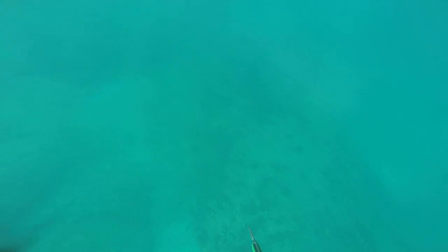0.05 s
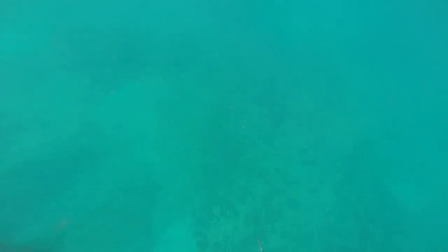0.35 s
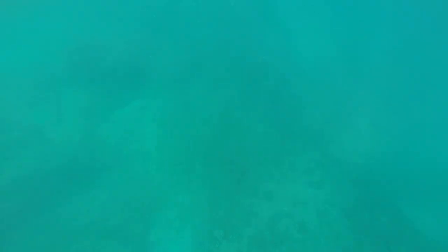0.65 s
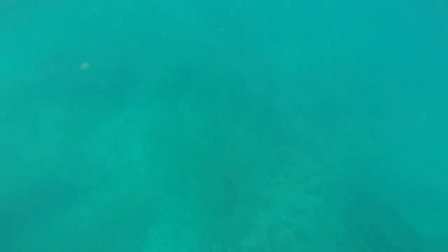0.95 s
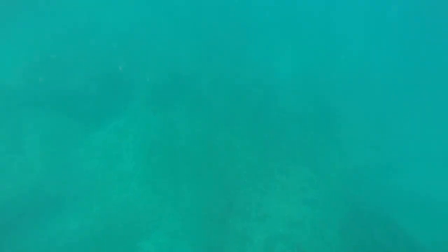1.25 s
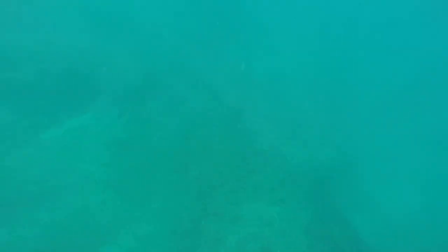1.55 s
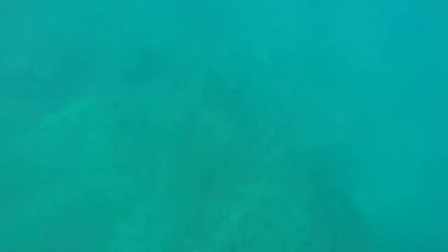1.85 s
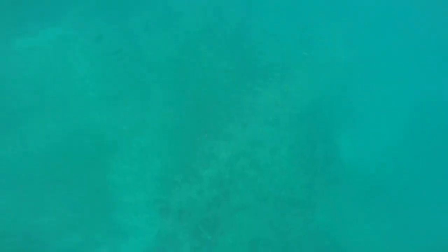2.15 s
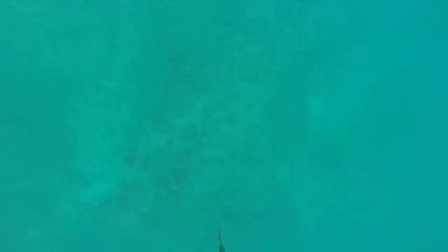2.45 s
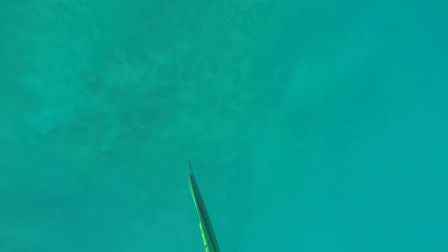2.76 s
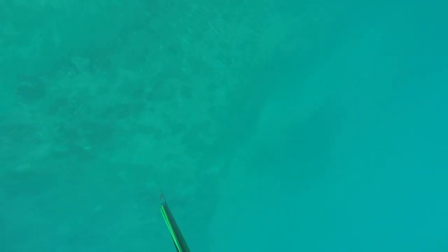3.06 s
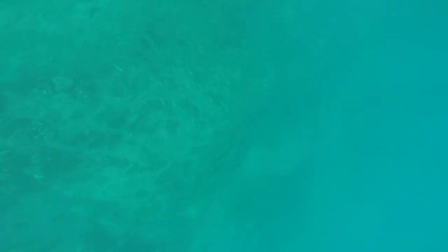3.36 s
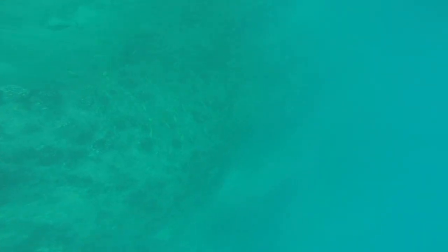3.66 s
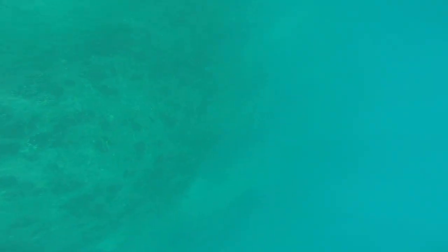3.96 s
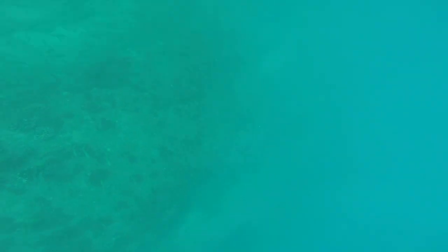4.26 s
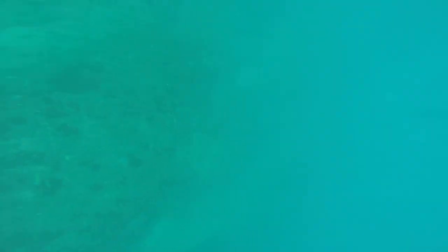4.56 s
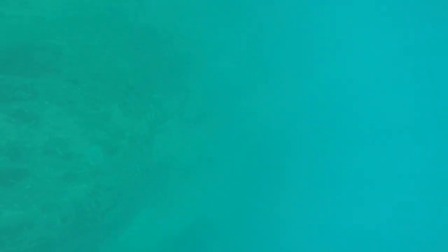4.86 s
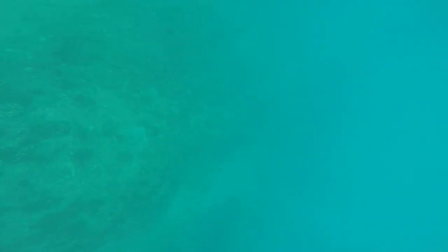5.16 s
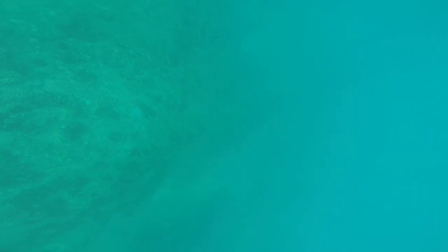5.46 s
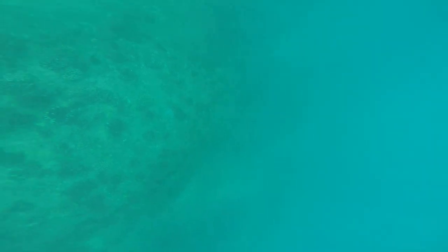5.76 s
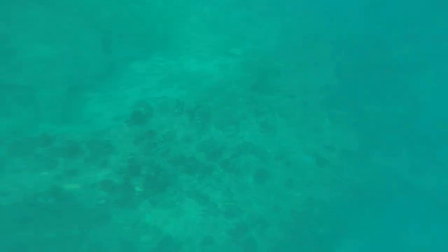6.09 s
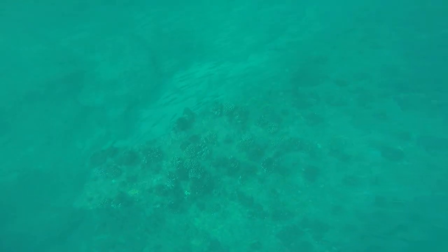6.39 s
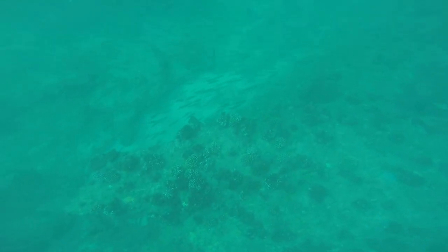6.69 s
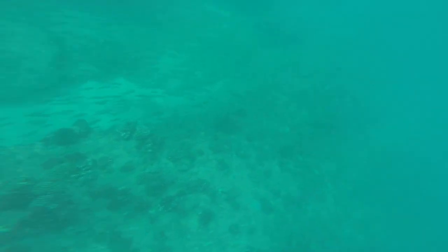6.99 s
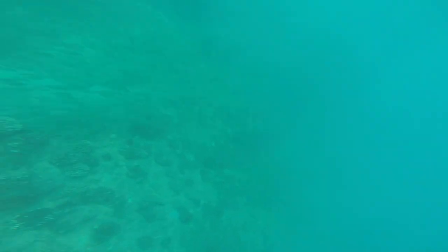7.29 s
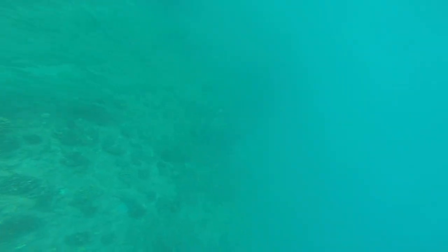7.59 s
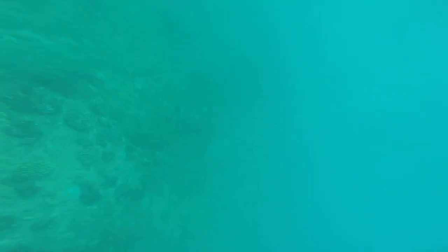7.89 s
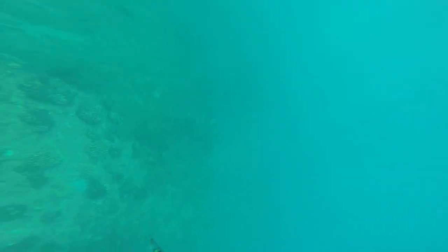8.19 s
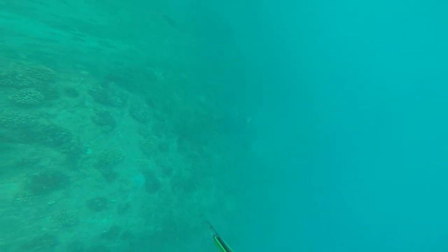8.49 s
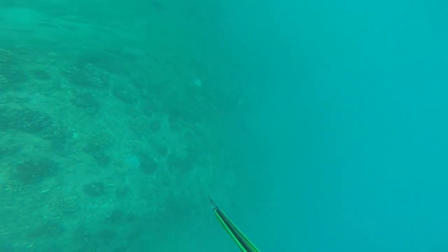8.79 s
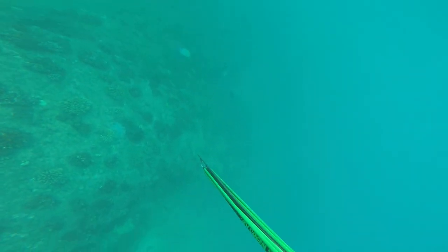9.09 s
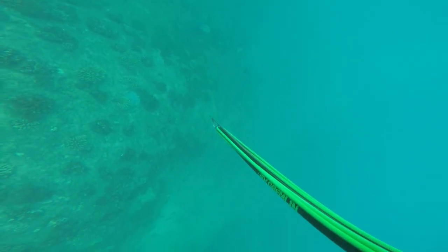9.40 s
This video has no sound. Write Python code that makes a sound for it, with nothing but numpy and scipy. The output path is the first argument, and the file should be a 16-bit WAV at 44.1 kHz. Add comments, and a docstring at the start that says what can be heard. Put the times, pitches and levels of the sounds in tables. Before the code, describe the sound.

Heard from inside a waterproof camera case, swirling water makes a muffled, uneven rumble. Bursts of bubbles gurgle close by, mixed with dull knocks and low thuds on the housing, the loudest a little past the middle. Runs of soft taps take over as the bubbles die down. Behind it all the reef crackles lightly, like snapping shrimp, with a faint hollow hum and a very faint electronic whine.

```python
"""Diver's camera over a reef

A swimming diver carries a camera in a waterproof housing. Eddies rumble on the case, clouds of
pulsating air bubbles gurgle past, and the case rings with dull knocks and runs of soft taps.
Behind it the reef crackles, most likely with snapping shrimp, over a hollow hum and a faint
electronic whine."""
import sys
import numpy as np
from scipy import signal
from scipy.io import wavfile
from scipy.ndimage import uniform_filter1d, map_coordinates

SR = 44100
rng = np.random.default_rng(int(sys.argv[2]) if len(sys.argv) > 2 else 0)


def log_audio(samples):
    """Write samples as a 16-bit WAV file to the path given in sys.argv[1]."""
    # one column per channel
    frames = np.atleast_2d(samples).T
    # limit to full scale, then quantise
    limited = np.clip(frames, -1, 1)
    pcm = np.round(limited * 32767).astype(np.int16)
    wavfile.write(sys.argv[1], SR, pcm)


N = 425124
TIME_S = np.arange(N) / SR

# electronics tones (frequency [Hz], rms level [dB])
WHINE_TONES = [(5844, -80), (8781, -91), (11688, -87), (11718, -86), (14627, -88)]
# hollow hum (time [s], level [dB])
HUM_LEVEL = [(0, -63.5), (.4, -47.5), (1.5, -46), (2.1, -65.5), (9.64, -50)]
# hollow hum (frequency [Hz], relative density [dB])
HUM_SHAPE = [(100, -16), (150, 5.5), (178, -3.5), (220, -27.5), (400, -14.5), (520, -19), (850, -18.5),
             (1400, -77), (4000, -74)]
# reef crackle (time [s], level [dB])
REEF_LEVEL = [(0, -68.5), (1.2, -57.5), (1.6, -60), (2.3, -56.5), (4.5, -56), (9.64, -56.5)]
# far snaps merged into a wash (frequency [Hz], relative density [dB])
WASH_SHAPE = [(120, -61), (200, -0.5), (272, -48), (476, -43.5), (671, 7), (946, -20), (1430, -29),
              (1880, -4), (2170, -9), (2460, -3.5), (2950, -11), (7150, -18.5), (8410, -28), (11400, -27.5),
              (15000, -75)]
# path through the case wall (frequency [Hz], relative gain [dB])
WALL_RESPONSE = [(300, -3), (700, 9), (1400, -2.5), (1850, 15), (2130, 0.5), (2350, 14), (2900, 3.5),
                 (4100, 4), (6200, -7), (7400, -1.5), (8400, -16), (10800, -10.5), (13500, -27),
                 (15500, -73)]
# near snaps (time [s], peak [dB], emphasis [Hz])
NEAR_SNAPS = [(0.135, -43, 6350), (0.343, -42, 3870), (.707, -32.5, 4000), (1.178, -36, 3900),
              (1.2049, -18.5, 4000), (1.952, -31, 5230), (2.332, -29.5, 3700), (2.362, -27, 2230),
              (2.599, -27.5, 2850), (3.156, -26, 1480), (3.672, -28, 5240), (3.693, -22, 2280),
              (4.175, -31.5, 6400), (4.723, -30, 6230), (4.85, -23, 3640), (5.49, -20, 2200),
              (5.815, -29, 2060), (6.028, -26, 1770), (6.523, -30, 5500), (6.577, -27, 3050),
              (7.236, -27, 2970), (8.215, -26.5, 1820), (8.553, -30.5, 3600), (8.775, -36, 1200),
              (8.964, -26, 2050), (9.412, -27, 3670)]
# water pushing past the case (time [s], level [dB])
FLOW_LEVEL = [(0, -54.5), (.72, -32.5), (1.3, -37), (1.85, -29), (2.02, -32.5), (2.28, -28), (2.55, -28.5),
              (3.2, -30), (3.5, -31), (4.17, -32), (4.3, -39.5), (5.9, -37.5), (6.29, -30), (6.5, -37.5),
              (7.3, -36.5), (8.6, -39), (8.8, -40), (9.64, -41.5)]
# eddy pressure (frequency [Hz], relative density [dB])
EDDY_SHAPE = [(12, 2), (25, 3.5), (45, -2.5), (70, -10.5), (110, -10.5), (140, -14), (175, -18),
              (235, -26.5), (320, -29.5), (430, -27.5), (600, -27.5), (800, -34.5), (1500, -44),
              (4000, -112)]
# runs of taps, each quicker than the last (first [s], last [s], nominal gap [s], level [dB])
SOFT_TAP_RUNS = [(5.038, 5.978, .157, -41), (6.546, 7.13, .146, -36.5), (7.297, 8.141, .14, -39),
                 (8.233, 9.634, .1, -38)]
# case modes under a tap (frequency [Hz], gain [dB], t60 [s])
SOFT_TAP_MODES = [(80, -9, 0.091), (115, 1.5, 0.047), (171, 6.5, 0.049), (456, -6, 0.011), (664, 2, 0.021)]
# slugs of water hitting the case (time [s], level [dB], frequency [Hz])
WATER_SHOVES = [(1.868, -20, 32.4), (2.206, -16, 85.5), (2.258, -15, 80), (2.289, -18.5, 85.6),
                (2.988, -11.5, 95), (3.155, -8.5, 72), (3.984, -12, 49.5), (6.173, -20.5, 74.5),
                (6.34, -10.5, 62), (6.359, -4, 73), (7.115, -22, 29.6), (7.717, -29, 43)]
# knocks on the case (time [s], level [dB], body pitch [Hz], shell gain [dB])
CASE_KNOCKS = [(.564, -25.5, 115, -11.5), (0.729, -14.5, 115, -16), (0.781, -22.5, 108, -18),
               (.93, -14, 127, -10), (0.995, -9, 132, -8.5), (2.542, -17.5, 137, -2.5),
               (3.006, -17, 134, 4), (3.11, -15, 78, -19), (3.155, -13.5, 148, -2.5),
               (3.986, -15.5, 162, -11), (4.144, -15.5, 111, -19), (5.352, -21, 119, -58),
               (6.134, -25.5, 192, 0.5), (6.188, -14.5, 109, -22), (6.365, -2.5, 201, -15),
               (9.585, -33, 221, 5.5)]
# case modes under a knock (frequency [Hz], gain [dB], t60 [s])
SHELL_MODES = [(325, 1.5, 0.019), (430, -5.5, 0.044), (706, -14, 0.021)]
# puffs of loose air (crest time [s], level [dB], swell [dB/s], fade [dB/s])
AIR_PUFFS = [(2.26, -28, 58, 36), (3.0, -30.5, 38, 25.5), (3.61, -28, 200, 65), (3.88, -35, 200, 127),
             (4.05, -30.5, 220, 31), (4.38, -37.5, 158, 11), (4.6, -28.5, 172, 181), (4.78, -33.5, 296, 35),
             (5.42, -30.5, 117, 18.5), (6.12, -37, 11, 34), (6.58, -43.5, 150, 170), (7.12, -45, 42, 75),
             (7.77, -47, 133, 81)]
# small bubbles shed by the swirl (time [s], level [dB])
FIZZ_LEVEL = [(1.3, -69), (1.72, -83), (1.85, -58), (4.3, -54.5), (4.7, -43), (5.0, -54), (6.2, -51),
              (7.8, -57.5), (8.3, -58), (8.7, -67), (9.64, -62)]
# bubble showers (start [s], length [s], level [dB], middle pitch [Hz], pitch spread [octaves])
AIR_GUSHES = [(1.793, 0.049, -55, 1880, 0.15), (2.201, 0.17, -37.5, 430, 0.81),
              (3.155, 0.014, -28.5, 1175, 0.52), (4.003, 0.091, -32.5, 692, 0.37),
              (4.542, .081, -33.5, 447, 0.27), (4.776, 0.058, -34.5, 435, 0.25),
              (5.448, .082, -38, 570, 0.11), (6.203, 0.036, -42, 1670, 0.12),
              (6.327, 0.057, -25.5, 307, 0.676)]
# single bubbles (time [s], level [dB], pitch [Hz], t60 [s])
SINGLE_BUBBLES = [(.499, -36, 1650, .026), (1.456, -28, 1880, .03), (1.638, -17.5, 1175, .016),
                  (1.799, -34, 1700, 0.031), (1.846, -36.5, 1900, .035), (1.889, -31, 1003, 0.071),
                  (1.99, -37, 580, 0.21), (2.123, -28.5, 1690, 0.067), (2.16, -25, 567, 0.25),
                  (2.208, -15, 430, 0.033), (2.256, -20, 298, 0.028), (2.335, -18, 650, 0.074),
                  (2.392, -23, 453, 0.19), (2.546, -18, 635, 0.022), (2.7, -15.5, 515, 0.025),
                  (2.84, -21.5, 502, 0.049), (3.006, -20, 472, 0.15), (3.032, -7.5, 430, 0.051),
                  (3.033, -9, 720, 0.023), (3.544, -21.5, 633, 0.053), (3.573, -23, 329, .17),
                  (3.866, -25.5, 738, .073), (4.569, -13.5, 525, .067), (4.601, -15, 440, 0.11),
                  (4.776, -17, 470, 0.13), (4.947, -24.5, 365, 0.24), (5.184, -26, 1670, .022),
                  (5.313, -21, 466, 0.1), (5.379, -34.5, 1100, 0.11), (5.421, -28, 1560, .025),
                  (5.451, -15, 558, 0.081), (5.463, -19.5, 493, 0.26), (5.904, -23, 677, 0.033),
                  (6.07, -27, 615, .15), (6.281, -13, 320, 0.022), (6.489, -27.5, 693, 0.075),
                  (6.539, -14, 585, 0.038), (6.566, -12.5, 500, 0.012), (6.587, -15, 555, 0.019),
                  (6.692, -20, 470, 0.03), (6.975, -33, 1806, 0.062), (7.06, -25.5, 750, 0.067),
                  (7.572, -33, 620, 0.097), (7.733, -27, 763, 0.051), (7.77, -37.5, 573, .22),
                  (8.1, -35, 673, 0.12), (8.172, -33.5, 640, 0.14), (8.271, -35, 1830, .035),
                  (8.3, -37, 720, 0.076), (8.371, -36.5, 1860, .035)]
# largest bubbles in the cloud (time [s], pitch [Hz])
DEEPEST_PITCH = [(1.9, 755), (2.27, 275), (2.5, 372), (2.85, 439), (3.4, 251), (4.1, 166.7), (4.6, 297.4),
                 (6.05, 487), (6.3, 312), (7.1, 530)]


def gain_of(db):
    return 10 ** (np.asarray(db) / 20)


def unit_rms(x):
    return x / np.sqrt(np.mean(x ** 2) + 1e-20)


def steadied(x, window_s):
    """Unit rms over a sliding window; faster flicker stays."""
    size = max(int(window_s * SR), 2)
    power = abs(uniform_filter1d(uniform_filter1d(x ** 2, size), size))
    return x / np.sqrt(power + 1e-6 * np.mean(x ** 2))


def follow(curve, at_s=TIME_S):
    return np.interp(at_s, *np.transpose(curve))


def add(mix, start_s, sound):
    part = mix[max(round(start_s * SR), 0):][:len(sound)]
    part += sound[:len(part)]


def colour(x, response, size=8192):
    """Minimum-phase filter from (frequency [Hz], gain [dB]): clicks stay sharp, then ring."""
    hz, db = np.transpose(response)
    bins_hz = abs(np.fft.fftfreq(size, 1 / SR)) + 1
    log_gain = np.log(gain_of(np.interp(np.log(bins_hz), np.log(hz), db)))
    spectrum = np.exp(np.conj(signal.hilbert(log_gain)))
    impulse = np.fft.ifft(spectrum).real[:size // 2]
    return signal.fftconvolve(x, impulse)[:len(x)]


def shaped_noise(shape):
    return unit_rms(colour(rng.standard_normal(N), shape))


def softened(x, cutoff_hz):
    """Low-pass: a blunt contact leaves out the treble."""
    return signal.sosfilt(signal.butter(4, cutoff_hz, fs=SR, output="sos"), x)


def ring(modes, length_s=.2):
    """Decaying sines, struck together."""
    t = np.arange(int(length_s * SR)) / SR
    return sum(gain_of(db - 60 * t / t60_s) * np.sin(2 * np.pi * hz * t) for hz, db, t60_s in modes)


def whine(drift_hz=9, flutter_db=2.5, hiss_db=-71.5, fade_in_s=.56):
    """Wavering electronics tones, half hidden in hiss."""
    knots_s = np.arange(0, N / SR + 1, .02)
    drift, flutter = (np.interp(TIME_S, knots_s, row) for row in rng.standard_normal((2, len(knots_s))))
    tones = sum(gain_of(db) * np.sqrt(2) * np.sin(2 * np.pi * np.cumsum(hz + drift_hz * drift) / SR)
                for hz, db in WHINE_TONES)
    hiss = gain_of(hiss_db) * rng.standard_normal(N)
    return (tones * gain_of(flutter_db * flutter) + hiss) * np.minimum(TIME_S / fade_in_s, 1)


def hum():
    """Low, hollow band of noise in the water."""
    return gain_of(follow(HUM_LEVEL)) * shaped_noise(HUM_SHAPE)


def snap(hz, focus_db=10):
    """One snap, smeared by short paths through the case, emphasised near hz."""
    t = np.arange(SR // 25) / SR
    envelope = (np.exp(-t / .0009) + .14 * np.exp(-t / .006)) * (1 - np.exp(-t / .0002))
    through_wall = colour(rng.standard_normal(len(t)) * envelope, WALL_RESPONSE)
    return colour(through_wall, [(hz / 1.6, -focus_db), (hz, 0), (hz * 1.6, -focus_db)])


def reef(clicks_per_s=560, spread_db=7.5, bands=16, dull_db=5, wash_db=3, bright_db=-1.5):
    """Countless snaps; the farthest merge into a wash."""
    fires = rng.random(N) < clicks_per_s / SR
    clicks = fires * gain_of(spread_db * np.minimum(rng.standard_normal(N), 2.5))
    band = rng.integers(0, bands, N)
    crackle = np.zeros((bands, N))
    for k, hz in enumerate(np.geomspace(1800, 10500, bands)):
        crackle[k] = signal.oaconvolve(clicks * (band == k), snap(hz))[:N]
    dull, bright = (unit_rms(half.sum(0)) for half in np.split(crackle, 2))
    low = gain_of(dull_db) * dull + gain_of(wash_db) * shaped_noise(WASH_SHAPE)
    reef_db = follow(REEF_LEVEL)
    top_db = reef_db.max()
    dip_db = reef_db - top_db
    # bright snaps persist as dull snaps and wash fade
    return gain_of(top_db + 2.45 * dip_db) * low + gain_of(top_db + bright_db + .75 * dip_db) * bright


def near_snaps(delay_s=.0008):
    """The nearest snaps reach the case directly: short and sharp."""
    out, t = np.zeros(N), np.arange(SR // 50) / SR
    envelope = np.exp(-t / .0007) + .12 * np.exp(-t / .004)
    for time_s, db, hz in NEAR_SNAPS:
        through_wall = colour(rng.standard_normal(len(t)) * envelope, WALL_RESPONSE)
        crack = colour(through_wall, [(hz / 2.5, -20), (hz, 0), (hz * 1.5, -6)])
        add(out, time_s + delay_s, gain_of(db) * crack / abs(crack).max())
    return out


def rumble(lump_s=.13, lump_db=2):
    """Eddies press on the case in slow lumps."""
    eddies = steadied(shaped_noise(EDDY_SHAPE), window_s=.14)
    lumps = map_coordinates(rng.standard_normal(400), [TIME_S / lump_s], order=1, mode="mirror")
    return gain_of(follow(FLOW_LEVEL) + lump_db * lumps) * eddies


def taps(jitter_s=.003, spread_db=2, detune=.07):
    """Soft, nearly even taps; each lands on a slightly different spot."""
    out = np.zeros(N)
    for first_s, last_s, gap_s, db in SOFT_TAP_RUNS:
        for time_s in np.linspace(first_s, last_s, round((last_s - first_s) / gap_s) + 1):
            late, force, *spot = rng.uniform(-.96, 1, 2 + len(SOFT_TAP_MODES))
            modes = [(hz * (1 + detune * offset), mode_db, t60_s)
                     for (hz, mode_db, t60_s), offset in zip(SOFT_TAP_MODES, spot)]
            add(out, time_s + jitter_s * late, gain_of(db + spread_db * force) * ring(modes))
    return softened(out, cutoff_hz=1290)


def shoves(rise_cycles=.56):
    """Slugs of water heave the case for a cycle or two."""
    out, t = np.zeros(N), np.arange(SR // 5) / SR
    for time_s, db, hz in WATER_SHOVES:
        rise = t * hz / rise_cycles
        envelope = (rise * np.exp(1 - rise)) ** 1.18
        add(out, time_s, -gain_of(db) * envelope * np.sin(2 * np.pi * hz * t))
    return out


def knocks(body_t60_s=.065):
    """Dull knocks ring the housing's body and shell."""
    out = np.zeros(N)
    for time_s, db, body_hz, shell_db in CASE_KNOCKS:
        struck = ring([(body_hz, 0, body_t60_s)]) + gain_of(shell_db) * ring(SHELL_MODES)
        add(out, time_s, gain_of(db) * softened(struck, cutoff_hz=750))
    return out


def bubble(hz, t60_s, glide, onset_cycles=.39):
    """An air pocket pulsates; moving along the case, its pitch slides by the fraction glide."""
    t = np.arange(int(t60_s * SR) + 2) / SR
    swing = np.sin(2 * np.pi * hz * t * (1 + glide * t / t60_s / 2))
    onset = 1 - np.exp(-(t * hz / onset_cycles) ** 2)
    return swing * onset * gain_of(-60 * t / t60_s)


def cloud(times_s, pitches_hz, t60_cycles, spread_db):
    """Bubbles of random strength and damping; most sag in pitch."""
    out = np.zeros(N)
    for time_s, hz in zip(times_s, pitches_hz):
        strength, sustain, slide = rng.standard_normal(3)
        t60_s = t60_cycles / hz * np.exp(.45 * sustain)
        pulse = bubble(hz, t60_s, glide=.09 * slide - .07)
        add(out, time_s, gain_of(spread_db * min(strength, 2)) * pulse)
    return out


def puff_envelope(lead_s=.3, linger_s=.59):
    """Amount of loose air: each puff swells, fades and drifts away."""
    power = np.zeros(N)
    for crest_s, db, swell_db_per_s, fade_db_per_s in AIR_PUFFS:
        age_s = TIME_S - crest_s
        nearness = np.exp(-np.maximum(age_s / linger_s, -age_s / lead_s) ** 4)
        level_db = db + np.minimum(swell_db_per_s * age_s, -fade_db_per_s * age_s)
        power += nearness * gain_of(level_db) ** 2
    return np.sqrt(power)


def fizz(count=2600, start_s=1.3, top_hz=1843, width_octaves=.88, puff_db=-19):
    """Small bubbles churn, most near top_hz, fewer below; louder with each puff."""
    when, size, detune = rng.random((count, 3)).T
    times_s = start_s + when * (N / SR - start_s)
    pitches_hz = top_hz * 2 ** (-width_octaves * size ** 1.45 + .31 * (detune - .5))
    air = cloud(times_s, pitches_hz, t60_cycles=36, spread_db=6)
    envelope = np.hypot(gain_of(follow(FIZZ_LEVEL)), gain_of(puff_db) * puff_envelope())
    return envelope * steadied(air, window_s=.32)


def gushes(count=45):
    """Air pockets tear into short, dense showers of bubbles."""
    out = np.zeros(N)
    for start_s, length_s, db, hz, octaves in AIR_GUSHES:
        times_s = length_s * np.linspace(0, 1, count) ** 1.5
        pitches_hz = hz * 2 ** (octaves * rng.uniform(-1.72, 1.855, count))
        air = cloud(times_s, pitches_hz, t60_cycles=14, spread_db=1.5)[:SR // 2]
        rms = np.sqrt(np.sum(air ** 2) / (length_s * SR))
        add(out, start_s, gain_of(db) * air / rms)
    return out


def glugs():
    """Single bubbles stand out from the cloud."""
    out = np.zeros(N)
    for time_s, db, hz, t60_s in SINGLE_BUBBLES:
        add(out, time_s, gain_of(db) * bubble(hz, t60_s, glide=.039))
    return out


def gurgle(count=2800, start_s=1.97, end_s=8.4, top_hz=900):
    """Large bubbles break off the swirl, most near the deepest pitch, fewer above."""
    times_s = np.linspace(start_s, end_s, count) + rng.uniform(-.01, .01, count)
    deepest_hz = follow(DEEPEST_PITCH, times_s)
    pitches_hz = deepest_hz + (top_hz - deepest_hz) * rng.beta(1.15, 2.0, count)
    air = cloud(times_s, pitches_hz, t60_cycles=42, spread_db=5.5)
    return puff_envelope() * steadied(air, window_s=.16)


def scene():
    """Mono mix at the camera."""
    water = rumble() + hum()
    air = gurgle() + gushes() + fizz() + glugs()
    housing = knocks() + shoves() + taps()
    background = reef() + near_snaps() + whine()
    return (water + air + housing + background)[None]


def record(dry, ceiling=.78, cutoff_hz=15300):
    """Soft microphone overload on the heaviest thump, then the band limit."""
    limited = dry / (1 + (dry / ceiling) ** 4) ** (1 / 4)
    lowpass = signal.firwin(255, cutoff_hz, window=("kaiser", 9), fs=SR)
    return signal.oaconvolve(limited, lowpass[None], "same")


dry = scene()
out = record(dry)
log_audio(out)
```